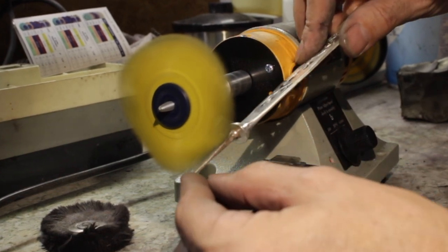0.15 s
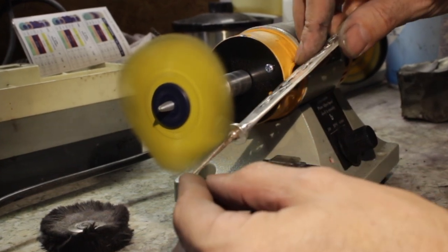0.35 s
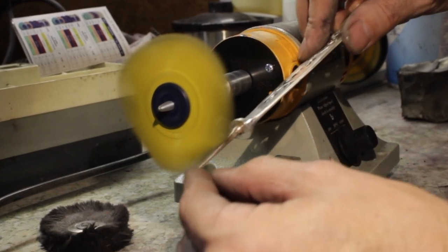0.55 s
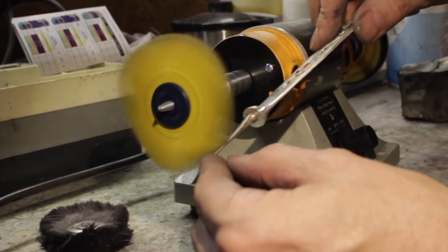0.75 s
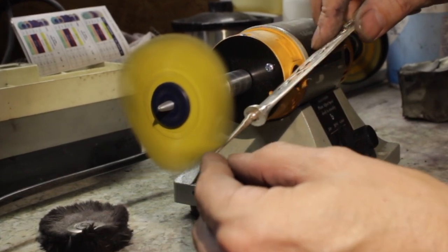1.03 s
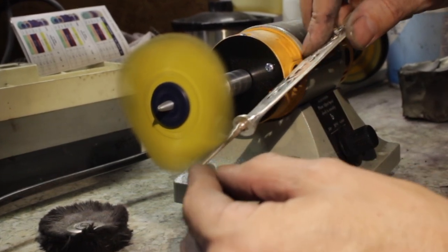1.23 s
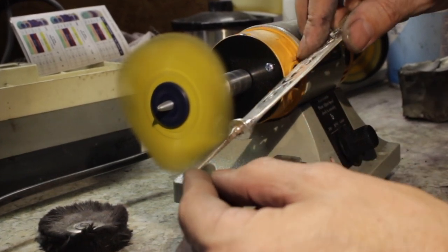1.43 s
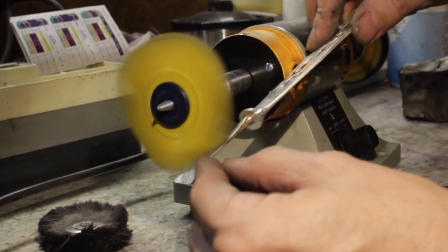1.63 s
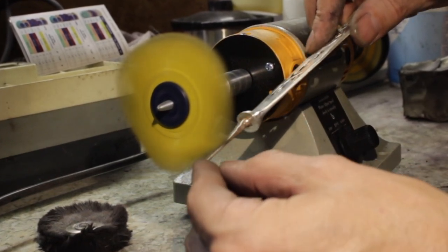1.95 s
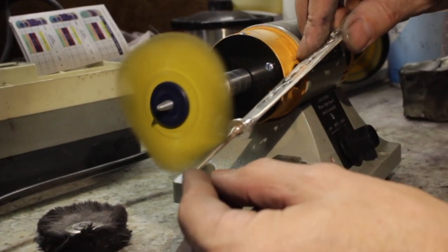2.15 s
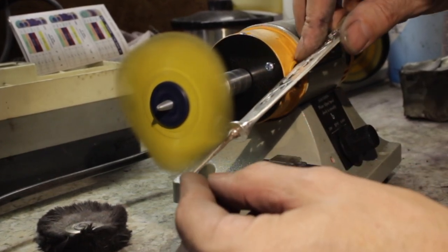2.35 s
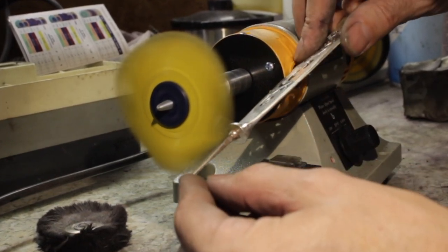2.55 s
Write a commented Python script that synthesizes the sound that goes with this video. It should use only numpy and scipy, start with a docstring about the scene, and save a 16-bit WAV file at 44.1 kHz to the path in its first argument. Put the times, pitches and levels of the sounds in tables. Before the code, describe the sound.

Close by in a workshop, a polishing wheel brushes against metal, making an even, abrasive hiss with a slight metallic ring. The motor drones underneath throughout, and a few brief, high squeaks slip in toward the end.

```python
"""A workshop: close by, a bench polisher spins a bristle disc against a thin metal piece.
Thousands of bristle tips scrape the piece and ring its resonances. The motor hums on multiples
of the shaft speed and of the mains, and its housing drones in one broad band.
Near the end come a few short squeaks, and the motor's sound fades."""
import sys
import numpy as np
from scipy import signal
from scipy.fft import rfft, irfft, next_fast_len
from scipy.io import wavfile
from scipy.ndimage import uniform_filter1d, map_coordinates

SR = 44100
rng = np.random.default_rng(int(sys.argv[2]) if len(sys.argv) > 2 else 0)


def bounce(signal):
    """Save signal as a 16-bit WAV file at the path given by the first command-line argument."""
    frames = np.transpose(np.atleast_2d(signal))
    limited = np.clip(frames, -1, 1)
    pcm = np.round(limited * 32767).astype(np.int16)
    wavfile.write(sys.argv[1], SR, pcm)


N = 119070
TIME_S = np.arange(N) / SR
SHAFT_HZ, MAINS_PULL_HZ = 59.22, 99.8


def amp(db):
    """Decibels to gain."""
    return 10 ** (np.asarray(db) / 20)


def unit_rms(x):
    """Scale to rms 1."""
    return x / np.sqrt(np.mean(x ** 2) + 1e-20)


def log_interp(points, hz):
    """Interpolate (Hz, value) points on a log frequency axis."""
    knots_hz, values = np.transpose(points)
    return np.interp(np.log(hz + 1), np.log(knots_hz + 1), values)


def curves(rows):
    """One value per sample for each column after the time."""
    knots_s, *columns = np.transpose(rows)
    return [np.interp(TIME_S, knots_s, column) for column in columns]


def wobble(knots_per_s):
    """Smooth random curve."""
    return map_coordinates(rng.standard_normal(N // 200), [TIME_S * knots_per_s])


def filtered(x, response):
    """Apply a gain given as a function of Hz."""
    size = next_fast_len(N + SR // 2)
    return irfft(rfft(x, size) * response(np.fft.rfftfreq(size, 1 / SR)), size)[..., :N]


def peak(f, hz, width_hz):
    """Gain of one resonance, 1 at its centre."""
    return 1 / np.sqrt(1 + (2 * (f - hz) / width_hz) ** 2)


# Each row: frequency in Hz, left-right correlation.
STEREO_CORRELATION = [(60, .97), (150, 0.91), (400, 0.95), (950, 0.98), (1600, 1), (1800, 0.99),
                      (2300, .97), (2550, 0.83), (2640, 0.77), (2760, 0.36), (2900, 0.89), (3600, 0.98),
                      (4100, 1), (4800, 0.97), (5500, 0.86), (7000, .6), (15000, 0.33)]

def stereo_noise(gain, patchy_db):
    """Shaped noise of rms 1 with faint patches of random gain."""
    spectra = signal.stft(rng.standard_normal((2, N)), nperseg=512)[2]
    patches = uniform_filter1d(rng.standard_normal(spectra.shape[1:]), size=6, axis=0)
    patches = uniform_filter1d(patches, size=14, axis=1)
    pair = signal.istft(spectra * amp(patchy_db * unit_rms(patches)), nperseg=512)[1][:, :N]
    angle = lambda f: np.arccos(np.clip(log_interp(STEREO_CORRELATION, f), -1, 1)) / 2
    mid, side = filtered(pair, lambda f: gain(f) * [np.cos(angle(f)), np.sin(angle(f))])
    return unit_rms(np.array([mid + side, mid - side]))


def harmonics(base_hz, rows, waver_db=2, drift_s=0.083e-3, scatter_cycles=0.18):
    """Near-aligned tones, one knock a cycle; each wavers in level and timing, so high ones blur most."""
    total = np.zeros(N)
    for multiple, db in rows:
        gain = np.sqrt(2) * amp(db + waver_db * wobble(knots_per_s=5.94))
        drifting_s = TIME_S + drift_s * wobble(knots_per_s=25)
        cycles = round(multiple) * base_hz * drifting_s + scatter_cycles * rng.standard_normal()
        total += gain * np.sin(2 * np.pi * cycles)
    return total


# Each row: multiple of the shaft speed, level in dB.
SHAFT_TONES = [(2, -89), (3, -75.5), (4, -77), (5, -66.5), (6, -68), (7, -63), (8, -64.5), (9, -51.5),
               (10, -60.5), (11, -55.5), (12, -63), (13, -80), (14, -72.5), (16, -62), (19, -71), (21, -66),
               (22, -59), (26, -63.5), (27, -61.5), (29, -62), (30, -77), (31, -66.5), (32, -58), (36, -64),
               (41, -55), (50, -60)]
# Each row: multiple of the mains pull, level in dB.
MAINS_TONES = [(1, -92), (3, -72), (4, -61.5), (5, -61.5), (8, -70), (14, -63.5), (29, -55)]

def motor_hum():
    """Tones of the turning shaft and of the magnetic pull of the mains."""
    return harmonics(SHAFT_HZ, SHAFT_TONES) + harmonics(MAINS_PULL_HZ, MAINS_TONES)


# Each row: time in seconds, drone level in dB.
DRONE_LEVELS = [(0, -46.5), (.18, -40.5), (.3, -43.5), (.6, -41.5), (.9, -44), (1.3, -42.5), (1.6, -43),
                (1.85, -45.5), (2.0, -44), (2.4, -44.5), (2.5, -49.5), (2.56, -37.5), (2.7, -45)]
# Each row: resonance in Hz, nominal width in Hz, relative level in dB.
HOUSING_MODES = [(487, 27, -7.5), (537.5, 65, -2.5), (609.7, 59, 1), (643.5, 62, -3)]

def housing_drone(rattle_depth=0.2):
    """The motor housing rumbles in overlapping resonances and pulses once a turn."""
    level_db, = curves(DRONE_LEVELS)
    shell = lambda f: np.sqrt(sum((amp(db) * peak(f, hz, width_hz) ** 3) ** 2
                                  for hz, width_hz, db in HOUSING_MODES))
    pulsing = 1 + rattle_depth * np.cos(2 * np.pi * (SHAFT_HZ * TIME_S - 0.25))
    return amp(level_db) * pulsing * stereo_noise(shell, patchy_db=1.43)


# Each row: start in seconds, length in seconds, pitch in Hz, level in dB.
SQUEAK_EVENTS = [(2.034, 0.041, 1770, -47.5), (2.38, 0.053, 2415, -39), (2.522, .02, 2570, -48),
                 (2.666, 0.017, 2514, -47)]

def squeaks(attack_s=0.01, t60_s=0.09):
    """Short clean whistles that swell, hold and ring out."""
    total = np.zeros(N)
    for start_s, length_s, hz, db in SQUEAK_EVENTS:
        age_s = TIME_S - start_s
        attack = np.clip(age_s / attack_s + 0.5, 0, 1)
        decay_db = 60 * np.clip(age_s - length_s, 0, None) / t60_s
        total += np.sqrt(2) * amp(db - decay_db) * attack * np.sin(2 * np.pi * hz * TIME_S)
    return total


def reflections_db(f, depth_db=1.0, spacing_hz=30):
    """Fine steady peaks and dips from nearby reflections."""
    return depth_db * map_coordinates(rng.standard_normal(SR // 10), [f / spacing_hz])


# Each row: resonance in Hz, width in Hz, boost in dB.
PIECE_MODES = [(928, 37, 3.5), (1103, 200, 4.5), (1413, 55, 7.5), (1634, 27, 7.5), (1940, 120, 1.5),
               (2170, 95, 5), (2390, 30, 9), (2465, 71, -0.5), (2580, 64, 5), (2677, 17, 9.5),
               (2733, 19, 11), (3067, 180, 7), (3334, 59, 6), (3777, 51, 9), (4193, 200, 7), (4724, 89, 5),
               (5100, 110, 3), (5424, 180, 3.5), (5620, 170, 3.5), (5950, 100, 3.5), (5980, 120, 1),
               (6740, 230, 2.5), (7520, 270, 4.5), (8950, 180, 3.5)]

def ringing_db(f):
    """Resonances of the metal piece and its holder."""
    return sum(db * peak(f, hz, width_hz) ** 2 for hz, width_hz, db in PIECE_MODES)


# Each row: frequency in Hz, relative spectral density in dB.
SCRAPE_SPECTRUM = [(45, -62), (70, -46), (100, -34.5), (250, -24.5), (430, -15), (720, -11.5), (860, -16.5),
                   (1000, -11), (1200, -11.5), (1550, -14), (1800, -9), (2230, -10.5), (2500, -8),
                   (2850, -9.5), (3500, -9.5), (4500, -6), (5200, -3.5), (6100, -4), (6300, -6),
                   (8300, -7.5), (10700, -8), (11000, -9.5), (15700, -16)]
# Each row: time in seconds, scrape level in dB, treble level in dB (taken about its mean).
SCRAPE_LEVELS = [(0, -34, -7.5), (.15, -34, -8.5), (.35, -33, -9), (.55, -32.5, -9), (.8, -33, -9),
                 (1, -33.5, -6), (1.2, -31.5, -10), (1.33, -33, -6.5), (1.4, -34, -8), (1.6, -33, -8),
                 (1.8, -33.5, -8.5), (2, -33.5, -6), (2.2, -32.5, -9), (2.4, -33.5, -8.5),
                 (2.58, -32.5, -10), (2.7, -34.5, -10)]
# Each row: time in seconds, boost of the sizzling band in dB.
SIZZLE_BOOSTS = [(0, 2), (.4, 1.5), (.8, 0.3), (1.25, 2.7), (1.5, 0.7), (1.9, 2), (2.2, -1), (2.55, 3.5),
                 (2.7, .1)]
# Each row: pulses per turn, depth from 0 to 1.
DISC_UNEVENNESS = [(1, 0.04), (2, 0.01), (4, 0)]

def bristles(treble_hz=7500, sizzle_hz=5600, sizzle_width_hz=370):
    """Bristle tips scrape the ringing piece; the uneven disc pulses the hiss a little each turn."""
    level_db, treble_db = curves(SCRAPE_LEVELS)
    sizzle_db, = curves(SIZZLE_BOOSTS)
    gain = lambda f: amp(log_interp(SCRAPE_SPECTRUM, f) + reflections_db(f) + ringing_db(f))
    hiss = stereo_noise(gain, patchy_db=0.55)
    treble = filtered(hiss, lambda f: f ** 4 / (f ** 4 + treble_hz ** 4))
    hiss += treble * (amp(treble_db - treble_db.mean()) - 1)
    sizzle = filtered(hiss, lambda f: peak(f, sizzle_hz, sizzle_width_hz) ** 2)
    hiss += sizzle * (amp(sizzle_db) - 1)
    pulsing = 1 + sum(depth * np.sin(2 * np.pi * (round(per_turn) * SHAFT_HZ * TIME_S + rng.random()))
                      for per_turn, depth in DISC_UNEVENNESS)
    flicker_db = 0.3 * wobble(knots_per_s=31.03)
    return amp(level_db + flicker_db) * pulsing * hiss


# Each row: frequency in Hz, left over right in dB.
BALANCE = [(60, 2.5), (290, 3), (640, 2.5), (1000, 1), (1410, 0.4), (2500, -0.5), (2700, 3.5), (3100, -0.1),
           (6300, 0.5), (7200, 1), (8000, 0), (10500, 0.5), (11200, .2)]
MOTOR_FADE_START_S, MOTOR_FADE_DB_PER_S = 2.45, 12

def scene():
    """Motor, bristles and squeaks; the motor fades at the end and the lows lean left."""
    fade = amp(-MOTOR_FADE_DB_PER_S * np.clip(TIME_S - MOTOR_FADE_START_S, 0, None))
    motor = motor_hum() + housing_drone()
    mix = fade * motor + bristles() + squeaks()
    return filtered(mix, lambda f: amp(log_interp(BALANCE, f) * [[0.5], [-0.5]]))


CUTOFF_HZ, DC_OFFSET = 15750, -0.0002

def record(dry):
    """Brick-wall low-pass and a tiny DC offset."""
    return filtered(dry, lambda f: f < CUTOFF_HZ) + DC_OFFSET


dry = scene()
out = record(dry)
bounce(out)
```